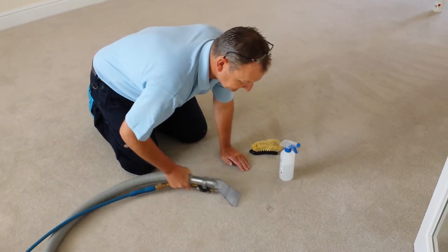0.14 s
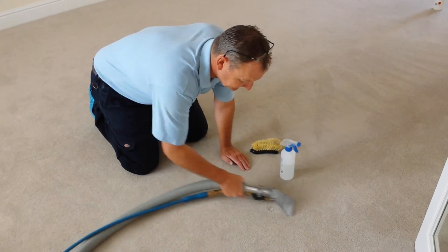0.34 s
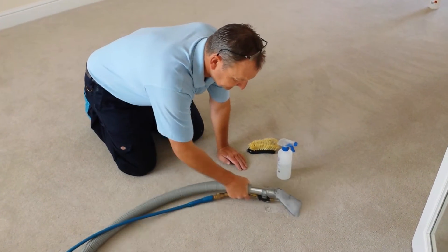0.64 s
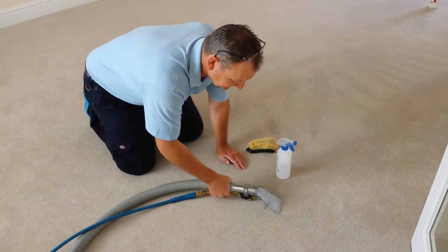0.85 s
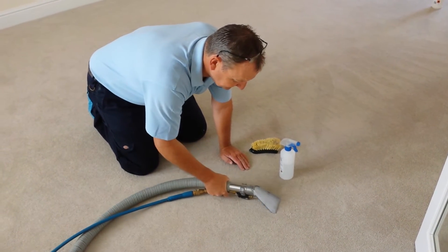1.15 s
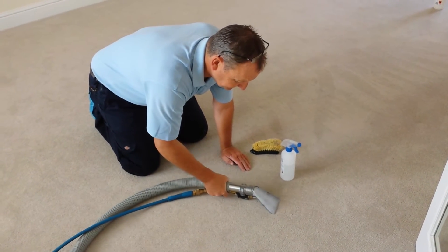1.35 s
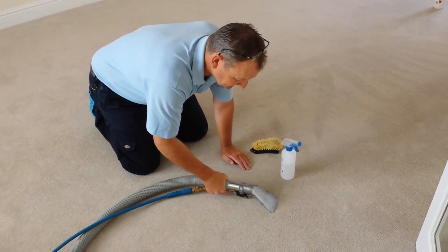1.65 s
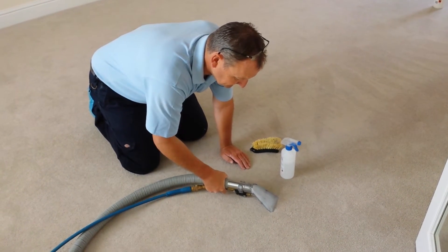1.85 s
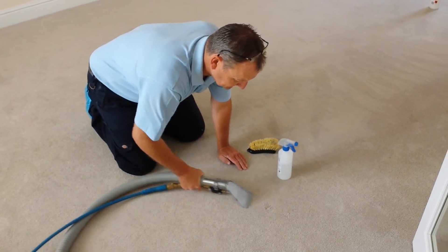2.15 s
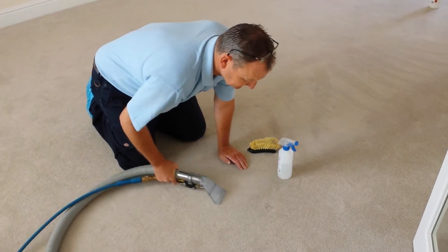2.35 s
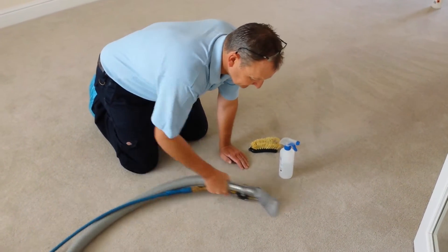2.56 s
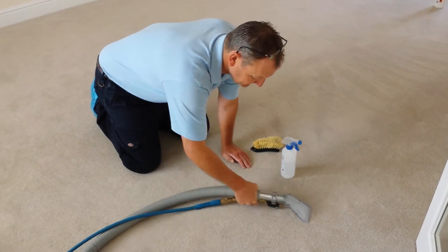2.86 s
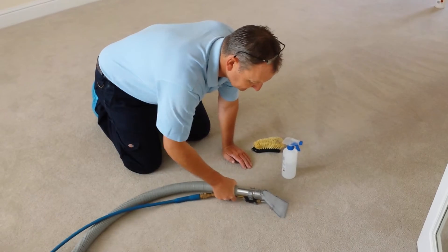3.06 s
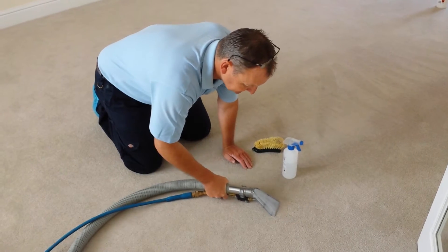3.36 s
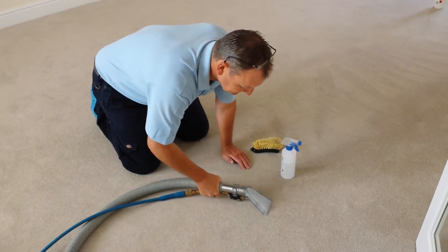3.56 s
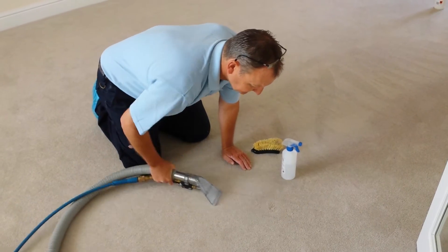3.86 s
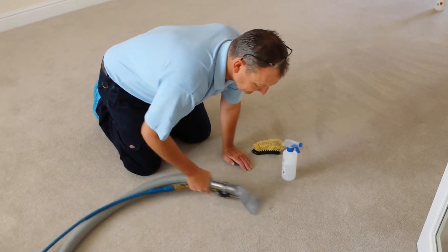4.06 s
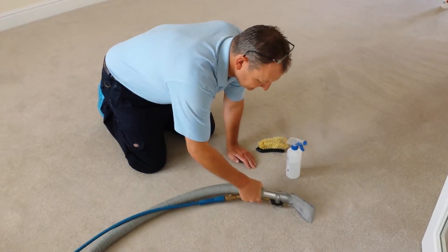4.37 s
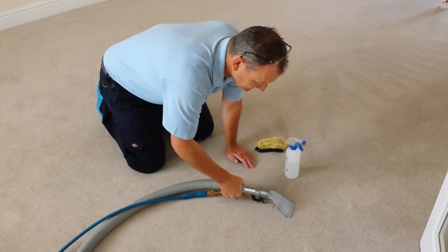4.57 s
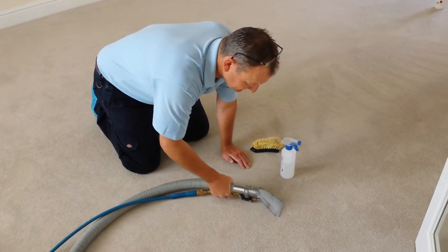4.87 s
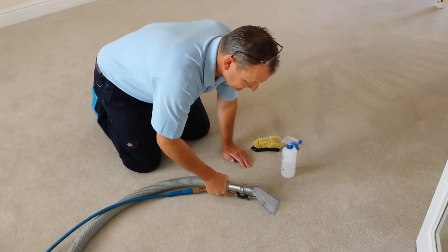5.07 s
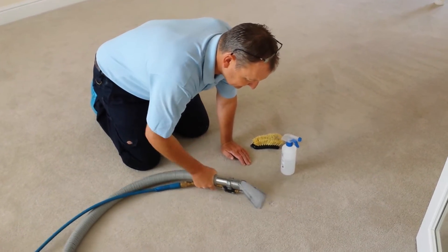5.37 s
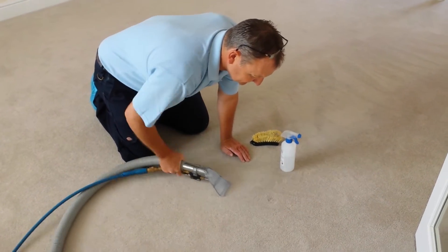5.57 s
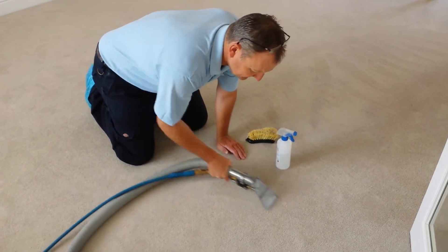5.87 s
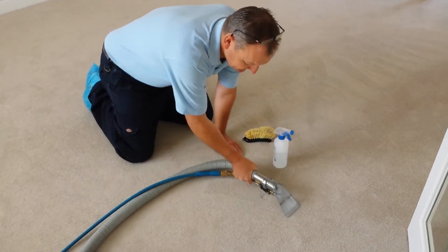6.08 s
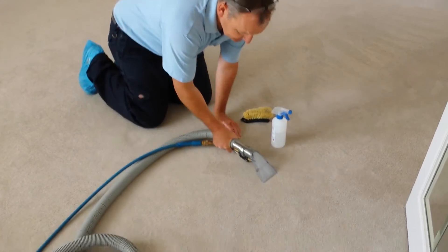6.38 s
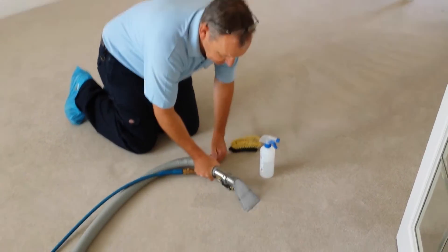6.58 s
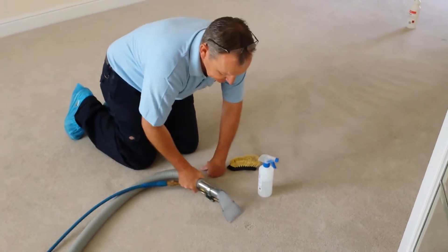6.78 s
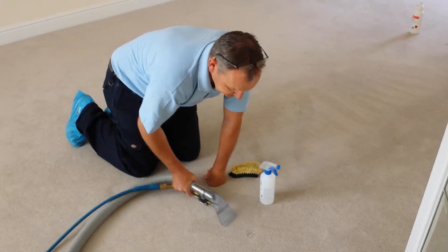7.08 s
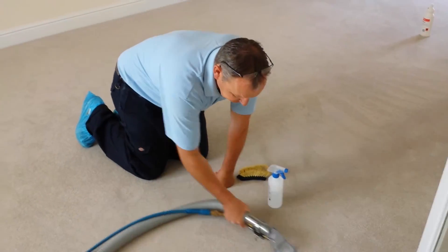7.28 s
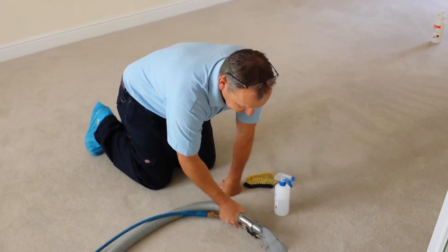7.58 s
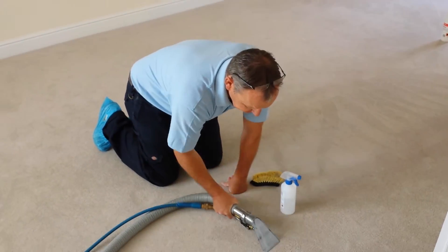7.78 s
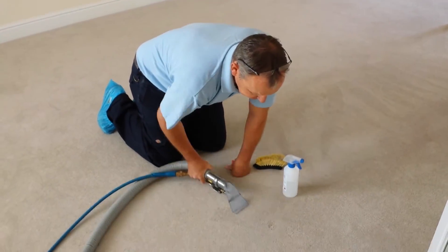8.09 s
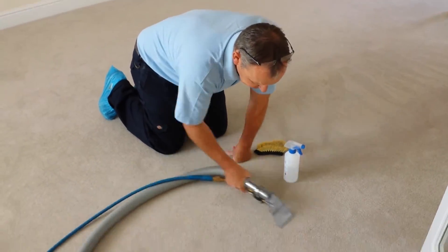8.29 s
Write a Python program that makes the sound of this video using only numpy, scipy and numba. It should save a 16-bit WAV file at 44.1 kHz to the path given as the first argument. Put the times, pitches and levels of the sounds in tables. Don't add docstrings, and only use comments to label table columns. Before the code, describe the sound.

Steady vacuum whine and rushing air in a furnished room, with a hand nozzle hissing as it lifts and reseals on carpet pile.

```python
import sys
import numpy as np
from scipy import signal
from scipy.fft import rfft, irfft
from scipy.io import wavfile
from numba import njit

SR = 44100
rng = np.random.default_rng(int(sys.argv[2]) if len(sys.argv) > 2 else 0)


def wrap_up_sound(samples):
    columns = np.atleast_2d(samples).T
    tamed = np.clip(columns, -1, 1)
    steps = np.round(tamed * 32767).astype(np.int16)
    wavfile.write(sys.argv[1], SR, steps)


def voltage_ratio(level):
    return 10 ** (np.asarray(level, float) / 20)


N = 372204
T = np.arange(N) / SR
HZ = np.fft.rfftfreq(N, 1 / SR)
FREE_HZ = 353


def in_time(table):
    s, *columns = np.transpose(table)
    return [np.interp(T, s, column) for column in columns]


def in_pitch(table):
    hz, value = np.transpose(table)
    return np.interp(np.log(HZ + 1), np.log(hz), value)


def shape(x, gain):
    return irfft(rfft(x) * gain, N)


def resonance(x, hz, width):
    y = shape(x, 1 / (1 + ((HZ - hz) / width) ** 2))
    return y / np.sqrt(np.mean(y ** 2))


def walk(rate):
    y = shape(rng.standard_normal(N), np.exp(-(HZ / rate) ** 2))
    return y / np.std(y)


def bell(s, length):
    return np.exp(-((T - s) / length) ** 2)


# time in seconds, shaft speed in Hz, level in dB.
MOTOR_SPEED = [(0.0, 353, -16.5), (0.4, 351, -17.5), (0.58, 353.6, -15.5), (1.04, 357, -16.5),
               (1.4, 357.7, -12.5), (2.16, 362.3, -14.5), (2.56, 357.8, -14.5), (3.12, 355.2, -15.5),
               (3.76, 359.5, -13.5), (4.08, 354, -17), (4.4, 356.5, -16), (5.56, 359.6, -12.6),
               (5.9, 355.4, -14.5), (6.44, 354.7, -17), (7.0, 358, -13), (7.28, 353.4, -17),
               (8.1, 355.4, -16), (8.44, 356.6, -16)]
# time of the snap in seconds, depth of the sag in dB, how long it builds in seconds.
SNAPS = [
    (.43, 7, 0.027),
    (2.628, 9, 0.011),
    (2.7, 2, .02),
    (4.2, 0, 0.096),
    (5.99, 7, 0.068),
    (7.279, 9, .05),
    (8.3, 6.5, 0.046),
    (8.36, 7, .03),
    (8.46, 12, .03),
]
# time in seconds, treble loss in dB.
FINGER = [(0.0, 13), (0.24, 16), (2.0, 13.5), (3.44, 11), (4.8, 12), (5.6, 13.5), (6.08, 21.5), (6.3, 19),
          (6.48, 8), (6.57, 33), (6.7, 36), (6.84, 22), (7.04, 29), (7.2, 10), (7.48, -1.5), (7.8, 7.5),
          (7.92, -6), (8.44, -2)]


def motors():
    hz, db = in_time(MOTOR_SPEED)
    octave_db = -46 + 1.65 * (hz - FREE_HZ) + 1.3 * (db + 15)
    sag_db = sum(depth * np.exp(np.minimum(T - s, 0) / lead) * (T < s) for s, depth, lead in SNAPS)
    db = db - sag_db
    lag = np.array([[0.], [.3]])
    turn = 2 * np.pi * np.cumsum(hz + .5 * walk(13.4)) / SR
    main = voltage_ratio(db + 0.13 * walk(34)) * np.sin(turn - lag)
    octave = voltage_ratio(octave_db + 0.78 * walk(25)) * np.sin(2 * turn - 3 * lag)
    second = voltage_ratio(db - 25.5 + 3.3 * walk(7.5)) * np.sin(1.067 * turn - lag)
    finger_loss_db = 14 * np.maximum(in_time(FINGER)[0] / 33.5, 0) ** 2.53
    return np.sqrt(2) * (main + octave + second) * voltage_ratio(-np.array([0 * T, finger_loss_db]))


# pitch in Hz, width in Hz.
SLOT = [
    (2320, 200),
    (2800, 160),
    (3950, 270),
    (5680, 420),
]
# level in dB, change in dB per Hz of motor speed.
SLOT_REST = [
    (-39, 0.3),
    (-41.5, 1.0),
    (-37, -1),
    (-35.5, -0.33),
]
# time in seconds, strength in dB, length in seconds, centre pitch in Hz.
OPENINGS = [(.36, 11.5, 0.3, 2700), (1.0, 4, 0.22, 5600), (1.2, 5.5, 0.18, 2500), (1.9, 3.5, 0.38, 2880),
            (2.533, 13, 0.17, 4070), (2.96, 5.5, .3, 2500), (4.05, 12.5, 0.24, 3500),
            (4.305, 5, 0.26, 2913), (4.5, 5.5, 0.42, 5700), (5.914, 9.5, 0.29, 2500), (6.1, 7, 0.44, 5000),
            (6.75, 10.5, 0.24, 4500), (7.1, -6, .12, 4800), (7.4, 8, 0.16, 5600), (7.6, 11, 0.13, 3530),
            (7.8, 7.5, 0.22, 2800), (8.074, 12, 0.21, 4420), (8.4, 9, .15, 5700), (8.44, 6, 0.11, 2800)]


def nozzle():
    out = 0
    speed_up_hz = in_time(MOTOR_SPEED)[0] - FREE_HZ
    for (hz, width), (rest_db, db_per_hz) in zip(SLOT, SLOT_REST):
        db = rest_db + db_per_hz * speed_up_hz
        for s, open_db, length, centre_hz in OPENINGS:
            nearness = np.exp(-(np.log2(hz / centre_hz) / 0.54) ** 2)
            db = db + open_db * nearness * bell(s, length)
        turn = 2 * np.pi * np.cumsum(hz * (1 + .022 * walk(2.0))) / SR
        a, b = resonance(rng.standard_normal((2, 2, N)), 0, width)
        ring = a * np.cos(turn) + b * np.sin(turn)
        out = out + ring * voltage_ratio(db + 1.2 * walk(11))
    return out


# pitch in Hz, likeness from -1 to 1.
LIKENESS = [(60, 0.81), (350, 0.94), (600, 0.48), (950, 0.18), (1300, -0.57), (1900, -0.11), (2800, 0.27),
            (4500, 0.074)]


def noise_pair():
    left, other = rng.standard_normal((2, N))
    like = np.clip(in_pitch(LIKENESS), -1, 1)
    right = shape(left, like) + shape(other, np.sqrt(1 - like ** 2))
    return np.array([left, right])


# time in seconds, strength in dB over the steady flow, length in seconds.
SLUGS = [(.42, 7, 0.17), (2.68, 10, 0.09), (4.153, 5.5, .25), (5.25, 3, .12), (5.501, -15, 0.11),
         (5.95, 7, 0.12), (6.705, 8, 0.065), (6.85, -12, .12), (7.358, 8, 0.12), (7.72, -8, .15),
         (8.4, 2, 0.22)]


def hose():
    db = -34.5 + sum(slug_db * bell(s, length) for s, slug_db, length in SLUGS)
    return resonance(noise_pair(), 335, 125) * voltage_ratio(db + 0.52 * walk(25))


# pitch in Hz, level in dB per Hz.
AIR = [(30, -100), (60, -73.5), (120, -54.5), (165, -54), (300, -54), (550, -60), (1000, -57.5),
       (1700, -60), (3200, -60.5), (6200, -61.5), (7000, -68), (8700, -73), (9500, -79), (14500, -81.5)]


def air():
    rush = shape(noise_pair(), voltage_ratio(in_pitch(AIR)) * np.sqrt(SR / 2))
    bass = shape(rush, 1 / (1 + (HZ / 700) ** 4))
    treble = rush - bass
    return bass * voltage_ratio(.5 * walk(4.0)) + treble * voltage_ratio(0.5 * walk(16.0))


# pitch in Hz, width in Hz, level in dB.
HUM = [(100, .2, -36), (200, .5, -35), (134, 2.5, -41), (148, 1, -39), (185, 3, -42), (246, 1, -45),
       (525, 5, -48), (820, 3, -47), (941, .8, -45), (963, 1, -48), (2279, 4, -47)]


def hum():
    out = 0
    for hz, width, db in HUM:
        turn = 2 * np.pi * np.cumsum(hz + width * walk(3 + width)) / SR
        out = out + np.sqrt(2) * voltage_ratio(db + 1.36 * walk(4.0)) * np.sin(turn)
    return np.array([out, out])


# time in seconds, level in dB, length in seconds.
RUBS = [
    (6.541, -24, .04),
    (6.642, -30, 0.044),
    (6.738, -29, .04),
    (6.813, -34, 0.049),
    (6.95, -36, .05),
    (7.11, -32, 0.043),
]


def finger_rubs():
    bells = sum(voltage_ratio(db) * bell(s, length) for s, db, length in RUBS)
    return bells * resonance(rng.standard_normal(N), 85, 52)


@njit
def one_pole(x, share):
    y, low = np.empty(len(x)), 0.
    for i in range(len(x)):
        low += share[i] * (x[i] - low)
        y[i] = low
    return y


# pitch in Hz, difference in dB.
RIGHT_PORT = [(100, 0), (1000, 0), (2100, -3.5), (4000, -0.5), (6000, -5.5), (8500, 4), (10000, 8),
              (14500, 5)]


def right_port(x):
    x = shape(x, voltage_ratio(in_pitch(RIGHT_PORT)))
    leak = np.minimum(voltage_ratio(-1.05 * in_time(FINGER)[0]), 1)
    low = one_pole(x, 1 - np.exp(-2 * np.pi * 5200 * leak / SR))
    return low + leak * (x - low)


# pitch in Hz, left share, right share.
SURVIVING = [(6000, 1, 1), (8500, .97, .75), (9300, .2, .55), (11000, .2, .52), (11800, .04, .52),
             (12300, .004, .5), (14500, 0, .22), (14700, 0, 0)]


def treble_dropouts(x, size=1024, count=8):
    start = 422
    n, k = np.arange(2 * size)[:, None] + .5, np.arange(size) + .5
    window = np.sin(np.pi * n / size / 2)
    basis = np.sqrt(2 / size) * window * np.cos(np.pi / size * (n + size / 2) * k)
    padding = (2 * size - start, 2 * size + (start - N) % size)
    blocks = np.pad(x, ((0, 0), padding)).reshape(2, -1, size)
    z = np.concatenate([blocks[:, :-1], blocks[:, 1:]], axis=2) @ basis
    hz = k * SR / size / 2
    s = (start + size * (np.arange(z.shape[1]) - 1)) / SR

    mask_hz, *shares = np.transpose(SURVIVING)
    share = np.array([np.interp(hz, mask_hz, c) for c in shares])[:, None] + 0 * s[:, None]
    loss_db = np.interp(s, *np.transpose(FINGER)) - 13
    height = np.maximum(np.log(hz / 11000), 0) / .28
    share[1] *= 1 + 3 * .012 * np.outer(loss_db, height)
    luck = rng.random((2, len(s) // 2 + 1, size // count))
    keep = np.repeat(np.repeat(luck, 2, axis=1)[:, :len(s)], count, axis=2) < share

    full_s = np.delete(.153 + .3203 * np.arange(12), 10)
    full = np.min(abs(s[:, None] - full_s), axis=1) < size / SR / 2
    lucky_bins = np.repeat(rng.random(size // count), count) < .8
    below_top = hz < rng.uniform(12800, 14700, (len(s), 1))
    keep |= full[:, None] & lucky_bins & below_top

    back = (z * keep) @ basis.T
    joined = (back[:, 1:, :size] + back[:, :-1, size:]).reshape(2, -1)
    return joined[:, size - start:][:, :N]


def scene():
    left, right = nozzle() + hose() + air() + hum()
    return np.array([left, right_port(right) + finger_rubs()]) + motors()


def low_pass(x):
    return signal.sosfilt(signal.butter(12, 14540, fs=SR, output="sos"), x)


def record(dry):
    noisy = dry + voltage_ratio(-51.0) * rng.standard_normal(dry.shape)
    heard = shape(noisy, 1 / (1 + (35 / (HZ + 1)) ** 2))
    return low_pass(treble_dropouts(heard))


dry = scene()
out = record(dry)
wrap_up_sound(out)
```